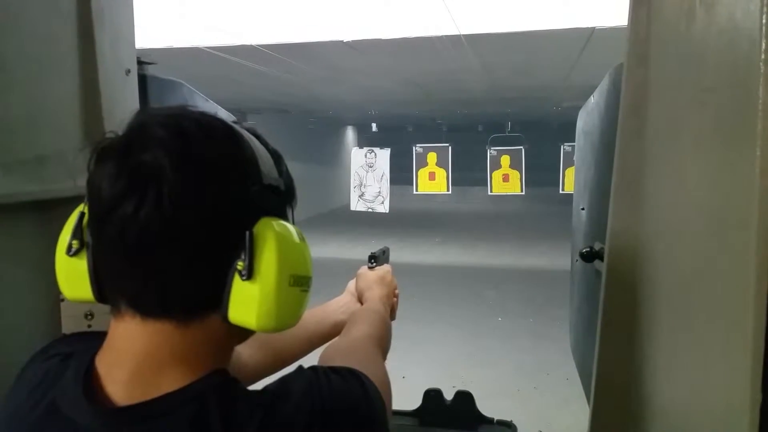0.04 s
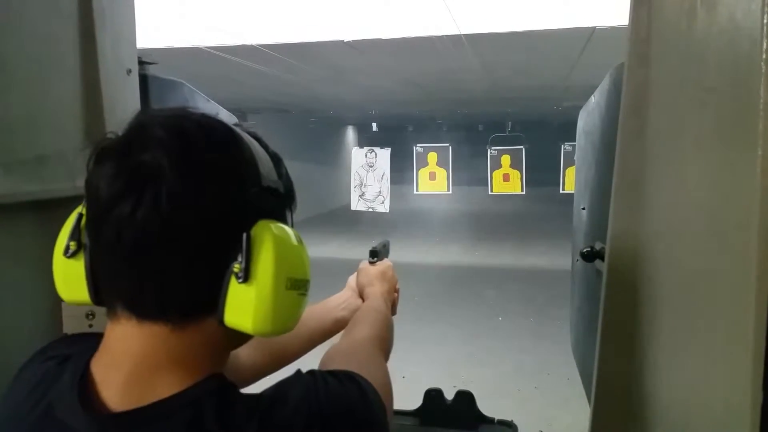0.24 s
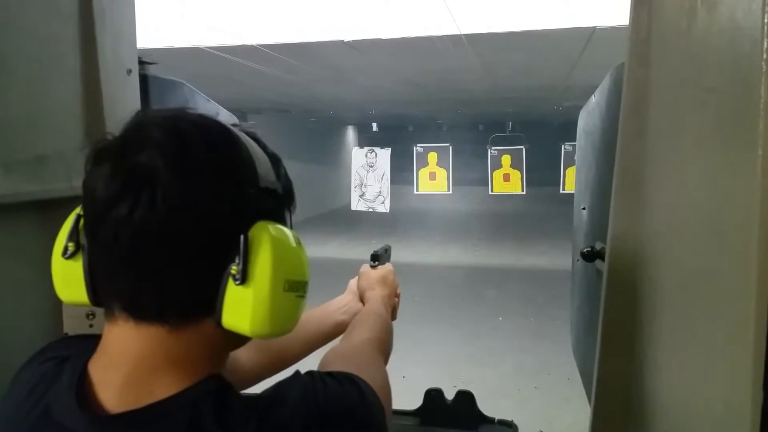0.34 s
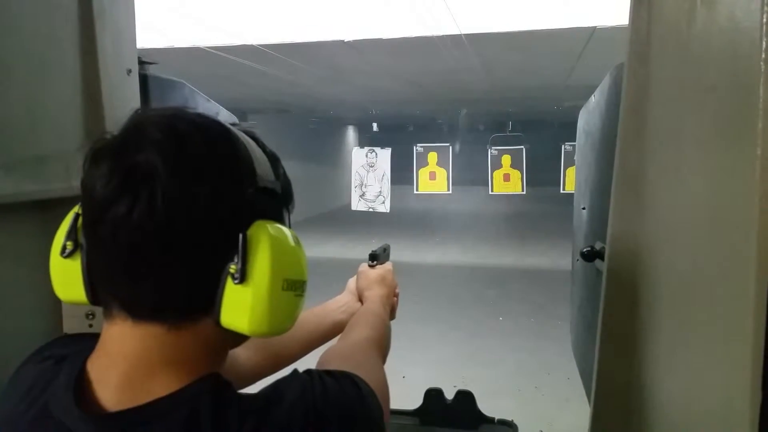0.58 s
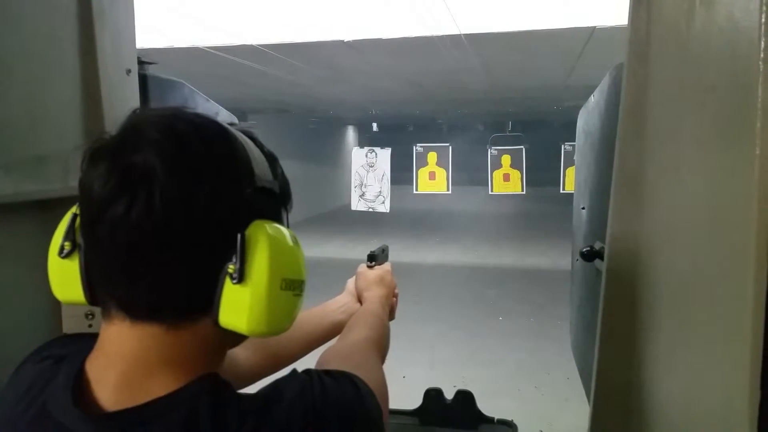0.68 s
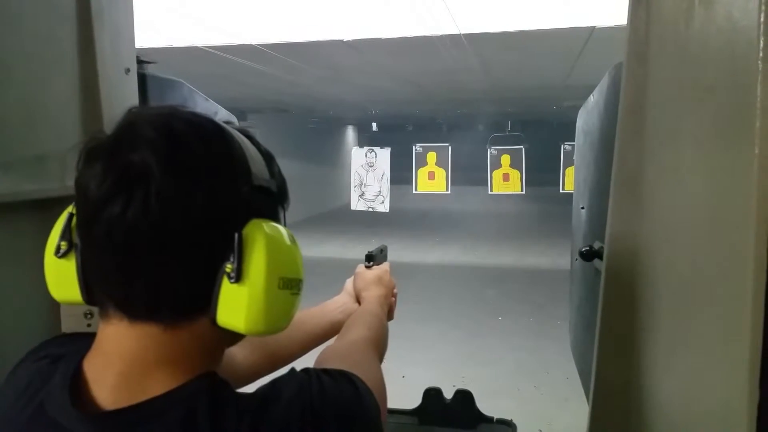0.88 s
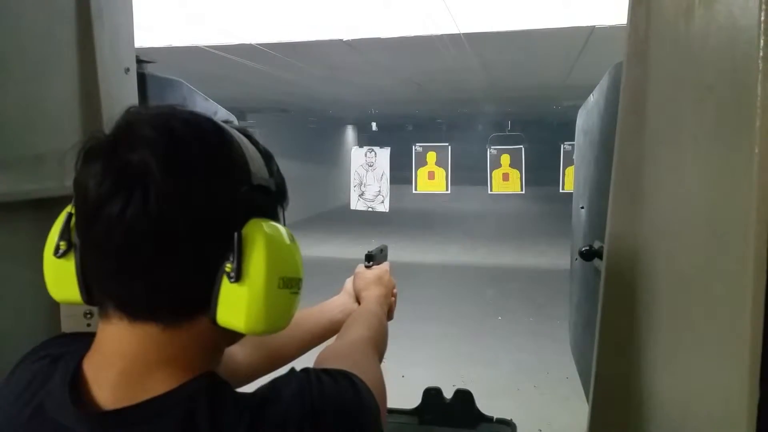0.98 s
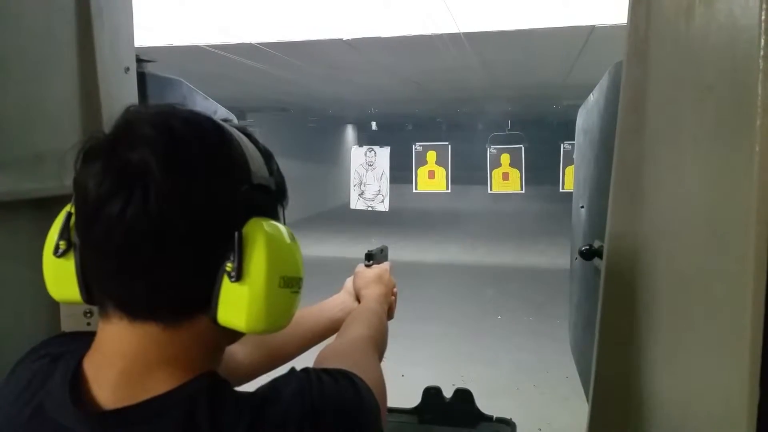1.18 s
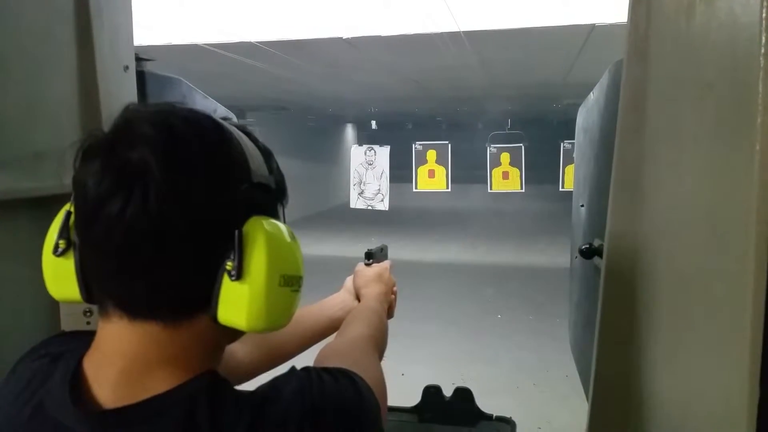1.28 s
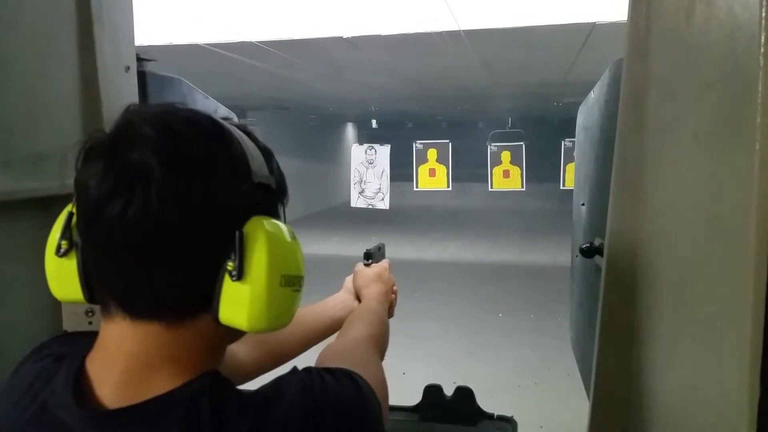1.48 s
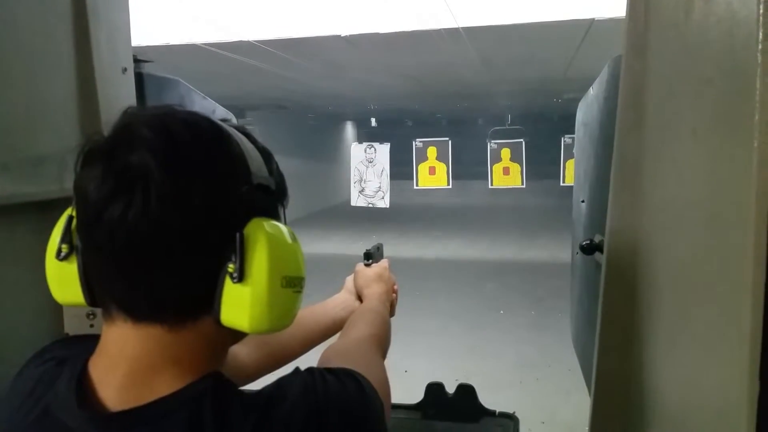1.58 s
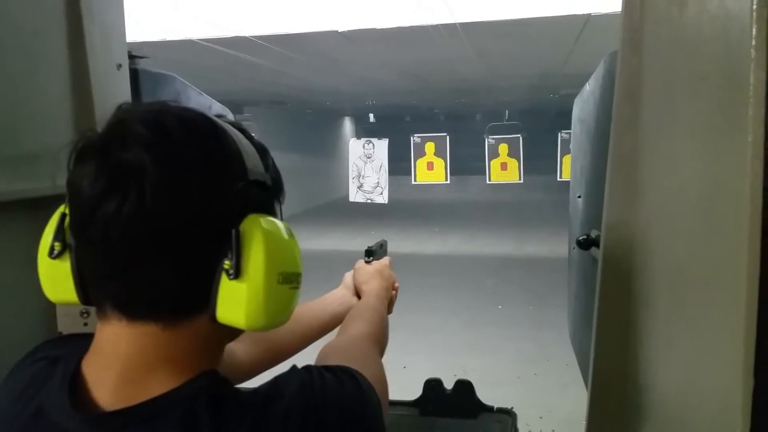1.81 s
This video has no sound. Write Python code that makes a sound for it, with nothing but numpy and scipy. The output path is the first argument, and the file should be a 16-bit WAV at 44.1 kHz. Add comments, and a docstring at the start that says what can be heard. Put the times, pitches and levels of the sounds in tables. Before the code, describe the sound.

One handgun shot, close and overloading the phone microphone, cracks after a brief rush of ventilation; the blast swells back through the long concrete hall and fades as the spent brass case bounces with bright pings.

```python
"""First comes the rush of ventilation in an indoor range, with a faint metallic tick: shaped noise.
Then one pistol shot from a booth: noise bursts for the crack and the rattle of the booth walls.
The long concrete hall fills with fading noise, and the blast swells back from its far end.
The spent brass case bounces: each bounce is a click, some ringing tones and a narrow hiss.
The phone's microphones overload, and its gain control ducks and recovers slowly."""
import sys
import numpy as np
from scipy import signal
from scipy.fft import rfft, irfft, dct
from scipy.io import wavfile
from scipy.ndimage import uniform_filter1d

SR = 44100
rng = np.random.default_rng(int(sys.argv[2]) if len(sys.argv) > 2 else 0)


def unload_audio(sound):
    """Save the sound as a 16-bit wav file, at the path given as the first command line argument."""
    columns = np.transpose(np.atleast_2d(sound))
    # keep every value between -1 and 1, then stretch to whole-number steps
    steps = np.round(np.clip(columns, -1, 1) * 32767)
    wavfile.write(sys.argv[1], SR, steps.astype(np.int16))


N = 81585  # length in samples

SHOT_S = 0.2242
ALIKE_BELOW_HZ = 626  # the two microphones hear longer waves alike


def undb(db):
    """Turn decibels into a gain."""
    return 10 ** (np.asarray(db) / 20)


def over_hz(hz, table, axis=1):
    """Read one column of a table at any frequency, on a log-frequency axis."""
    table = np.array(table, float)
    log_hz = np.log(np.maximum(hz, 1))
    return np.interp(log_hz, np.log(table[:, 0]), table[:, axis])


def bins():
    """Frequencies of the spectrum's bins in Hz."""
    return np.arange(N // 2 + 1) * SR / N


def since(start):
    """Seconds since a moment, zero before it."""
    return np.maximum(np.arange(N) / SR - start, 0)


def decay(age, t60):
    """Exponential decay that has dropped 60 dB after t60 seconds."""
    return np.exp(-np.log(1000) * age / t60)


def fade(start, t60):
    """Sudden onset and exponential decay."""
    age = since(start)
    return (age > 0) * decay(age, t60)


def wander(rate):
    """Random points of unit spread, so many a second, joined by straight lines."""
    points = rng.standard_normal(N)
    return np.interp(since(0) * rate, np.arange(N), points)


def diffuse():
    """Spectrum of white noise arriving from all sides at two microphones."""
    alike = 1 / (1 + (bins() / ALIKE_BELOW_HZ) ** 2)
    mid, side = rfft(rng.standard_normal((2, N)))
    shared = np.sqrt(1 + alike) * mid
    opposed = np.sqrt(1 - alike) * side * np.array([[1], [-1]])
    return (shared + opposed) / np.sqrt(2)


def noise(colour):
    """Diffuse noise with the tone colour of a table, rms 1."""
    x = irfft(diffuse() * undb(over_hz(bins(), colour)), N)
    return x / x.std()


def band(hz, width_hz):
    """Diffuse noise through one resonance, half as strong width_hz away from its peak, rms 1."""
    x = irfft(diffuse() / (1 + ((bins() - hz) / width_hz) ** 2), N)
    return x / x.std()


def reverberation(table):
    """Dense reflections of the shot; every band starts at its own level and dies at its own rate."""
    freqs, age = bins(), since(SHOT_S)
    field = diffuse() * undb(over_hz(freqs, table)) * np.sqrt(SR / 2)  # levels are per Hz
    centres = np.array(table)[:, 0]
    out = 0
    for (_, _, t60), share in zip(table, np.eye(len(table))):
        overlap = np.interp(freqs, centres, share)  # neighbouring bands cross-fade
        out = out + irfft(field * overlap, N) * decay(age, t60)
    return out * (age > 0)


VENT_DB, VENT_WANDER_DB = -24, -1.3
# Tone colour of the moving air. Each row: frequency in Hz, relative level in dB per Hz.
VENT_COLOUR = [(25, -6), (50, 6), (120, -6), (250, 0), (550, 5), (900, 0), (1300, -8), (2200, -8),
               (4000, -20.5), (8000, -30.5), (15000, -45.5)]


def ventilation():
    """Steady rush of air that wanders a little in level."""
    level_db = VENT_DB + VENT_WANDER_DB * wander(10.33)  # points per second
    return noise(VENT_COLOUR) * undb(level_db)


TICK_S, TICK_DB = 0.026, -39


def tick():
    """A faint metallic tick before the shot: a fading band of high noise."""
    return undb(TICK_DB) * band(6500, width_hz=2500) * fade(TICK_S, t60=0.081)


# Tone colour of a sharp knock. Each row: frequency in Hz, relative level in dB per Hz.
CLICK_COLOUR = [(1500, -14), (4500, -6.5), (7500, 1.5), (11000, -4.5), (15000, -5)]


def sharp_noise():
    """Bright noise shared by the crack of the shot and the clicks of the case."""
    return noise(CLICK_COLOUR)


CLICK_T60_S = 0.022
CLICK_ROOM_DB, CLICK_ROOM_T60_S = -23, 0.35


def click(start):
    """A small hard contact with its short room tail."""
    contact = fade(start, CLICK_T60_S)
    room = undb(CLICK_ROOM_DB) * fade(start, CLICK_ROOM_T60_S)
    return sharp_noise() * (contact + room)


RING_WIDTH_HZ = 73
WASH_WIDTH_HZ, WASH_T60_S = 680, 0.18  # the hall smears each ping into a narrow hiss
# Tones the brass case can ring at.
# Each row: frequency in Hz, relative level in dB, time to fade by 60 dB in seconds.
CASE_MODES = [(7960, -3, 0.68), (8620, -4.5, .8), (10130, -12.5, 0.72), (10940, -11, 0.13),
              (11820, -17, 0.39), (14090, -13, 0.23), (14800, -10, 0.14), (15390, -14, .27)]
# Bounces of the case. Each row: start in seconds, ring level in dB, click level in dB,
# hiss level in dB, most excited frequency in Hz, spread in octaves, left minus right in dB.
CASE_BOUNCES = [(.9624, -43, -35, -55, 14000, .5, 2), (1.135, -21, -13, -33, 14100, 0.48, 0.5),
                (1.64, -14, -20, -21, 10560, 0.035, -2), (1.756, -46.5, -48, -47, 10300, 0.071, -21)]


def brass_case():
    """Each bounce clicks and rings some of the case's modes; reflections make them waver and hiss."""
    rings = [band(hz, RING_WIDTH_HZ) for hz, _, _ in CASE_MODES]
    out = 0
    for start, ring_db, click_db, wash_db, centre_hz, octaves, pan_db in CASE_BOUNCES:
        wash = band(centre_hz, WASH_WIDTH_HZ) * fade(start, WASH_T60_S)
        sound = undb(click_db) * click(start) + undb(wash_db) * wash
        for (hz, db, t60), ring in zip(CASE_MODES, rings):
            # modes far from the most excited frequency ring less
            excited = 1 / (1 + (np.log2(hz / centre_hz) / octaves) ** 2)
            sound = sound + undb(ring_db + db) * excited * fade(start, t60) * ring
        out = out + sound * undb(np.array([[pan_db], [-pan_db]]) / 2)
    return out


HALL_DB, HALL_BUILD_S = 0, 0.2
RETURN_S, RETURN_WIDTH_S, RETURN_DB = 0.579, 0.1, 16  # centre, spread and level of the swell
# Reverberation of the hall.
# Each row: frequency in Hz, starting level in dB per Hz, time to fade by 60 dB in seconds.
HALL_BANDS = [(100, -52.5, 2.0), (236, -34, 2.75), (428, -20, 2.25), (562, -8.5, 2.55), (740, -9.5, 2.53),
              (1020, -2.5, 2.408), (1470, -3.5, 2.153), (2230, -8, 1.945), (3035, -12.5, 1.844),
              (4540, -22.5, 1.715), (6500, -25, 1.427), (9580, -29.5, 0.94), (12000, -26, 0.63),
              (15500, -27, 0.55)]
# Tone colour of the returning blast. Each row: frequency in Hz, relative level in dB per Hz.
RETURN_COLOUR = [(100, -33.5), (300, -16), (550, -1.5), (1200, -3), (1900, -6), (3500, -18.5), (8000, -59)]


def hall():
    """Reverberation builds up, swells as the blast returns from the far end, and loses its highs first."""
    build = 1 - np.exp(-since(SHOT_S) / HALL_BUILD_S)
    swell = undb(RETURN_DB) * np.exp(-0.5 * ((since(0) - RETURN_S) / RETURN_WIDTH_S) ** 2)
    return build * (undb(HALL_DB) * reverberation(HALL_BANDS) + swell * noise(RETURN_COLOUR))


LEAK_LEAD_S, LEAK_DB = 0.0017, 0  # first gas escapes just ahead of the blast
CRACK_DB, CRACK_T60_S = 37, 0.014
BOOTH_DB = -3
FLUTTER_PER_S, FLUTTER_DB = 130, 2.5  # reflections in the booth arrive in clumps
# Muzzle blast among the booth walls, before the booth level is added.
# Each row: frequency in Hz, starting level in dB per Hz, time to fade by 60 dB in seconds.
BOOTH_BANDS = [(100, -41, 0.54), (297, -22, 0.53), (596, -10, 0.28), (1420, -7, 1), (2750, -7.5, 1),
               (4980, -15, 1), (9180, -21.5, 0.79), (15000, -23, 0.67)]


def blast():
    """A puff of gas, the crack, then bright clumped reflections from the booth."""
    leak = undb(LEAK_DB) * fade(SHOT_S - LEAK_LEAD_S, CRACK_T60_S)
    crack = undb(CRACK_DB) * fade(SHOT_S, CRACK_T60_S)
    booth_db = BOOTH_DB + FLUTTER_DB * wander(FLUTTER_PER_S)
    return (leak + crack) * sharp_noise() + undb(booth_db) * reverberation(BOOTH_BANDS)


def scene():
    """Everything that reaches the two microphones."""
    return ventilation() + tick() + brass_case() + hall() + blast()


OVERLOAD_DB, OVERLOAD_KNEE = 18.5, 16  # a higher knee number bends more abruptly
PHASE_TURN_HZ = 3500
# Microphone colour. Each row: frequency in Hz, left gain in dB, right gain in dB.
MIC_COLOUR = [(20, -24, -15.5), (60.4, -8, -11.5), (146, -1, -1), (1620, -2.5, -2.5), (2400, -2, -4),
              (3430, -2, -7), (4700, -5.5, -5), (5840, -6, -3), (9500, -6.5, -4.5), (12300, -1.5, 2),
              (16000, 4.5, 4)]


def microphones(x):
    """The capsules flatten loud peaks; the input stage then colours the sound and turns its phase."""
    # flatten at twice the sample rate to limit false tones
    drive = signal.resample_poly(x, 2, 1, axis=1, padtype="edge") / undb(OVERLOAD_DB)
    flat = drive / (1 + np.abs(drive) ** OVERLOAD_KNEE) ** (1 / OVERLOAD_KNEE)
    x = signal.resample_poly(flat, 1, 2, axis=1, padtype="edge") * undb(OVERLOAD_DB)
    hz = np.arange(N) * SR / (2 * N)
    colour = undb(np.array([over_hz(hz, MIC_COLOUR, axis=1), over_hz(hz, MIC_COLOUR, axis=2)]))
    x = dct(dct(x, norm="ortho") * colour, type=3, norm="ortho")
    # two all-pass filters turn the phase and leave the level of each frequency alone
    pole = np.exp(-2 * np.pi * PHASE_TURN_HZ / SR)
    turned = signal.lfilter([-pole, 1], [1, -pole], x)
    return signal.lfilter([-pole, 1], [1, -pole], turned)


CEILING_DB, LOOKAHEAD_S, RECOVER_DB_PER_S = 3.5, 0.015, 5.5  # ceiling relative to full scale


def gain_control(x):
    """The gain drops just ahead of a peak and creeps back."""
    peak_db = 20 * np.log10(np.abs(x).max(axis=0) + 1e-9)
    excess_db = np.maximum(peak_db - CEILING_DB, 0)
    recovery = RECOVER_DB_PER_S * since(0)
    cut_db = np.maximum.accumulate(excess_db + recovery) - recovery
    # average the cut over the moments just ahead
    ahead = int(LOOKAHEAD_S * SR)
    padded = np.pad(cut_db, (0, ahead), mode="edge")
    cut_db = uniform_filter1d(padded, ahead)[ahead // 2:][:N]
    return x * undb(-cut_db)


TOP_HZ = 15750


def record(dry):
    """Overload, gain control, full-scale clipping and the top cut."""
    x = np.clip(gain_control(microphones(dry)), -1, 1)
    top_cut = signal.ellip(10, 0.2, 70, TOP_HZ, fs=SR, output="sos")
    return signal.sosfilt(top_cut, x)


dry = scene()
out = record(dry)
unload_audio(out)
```